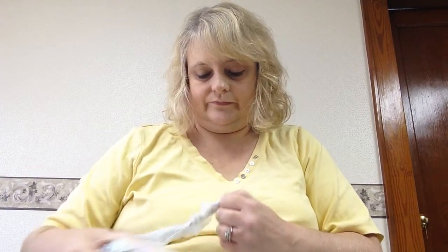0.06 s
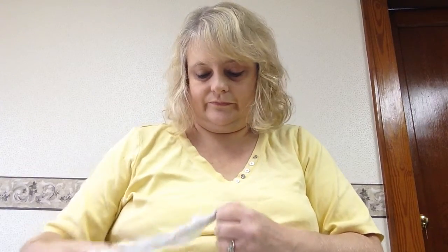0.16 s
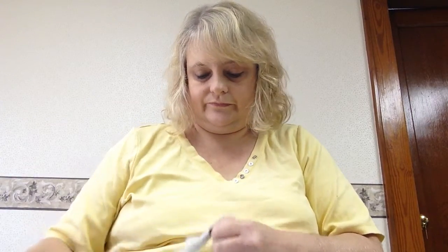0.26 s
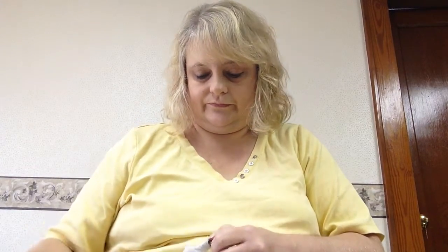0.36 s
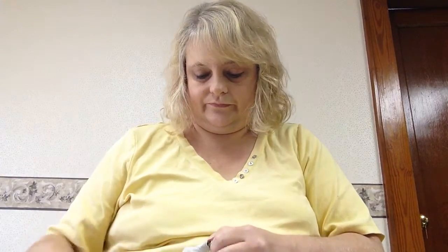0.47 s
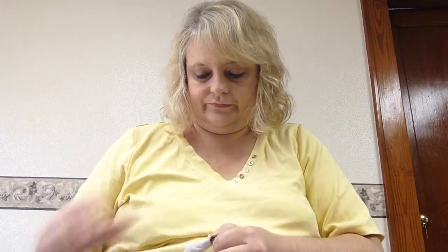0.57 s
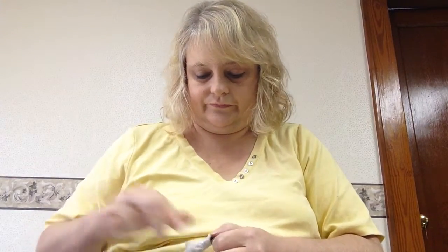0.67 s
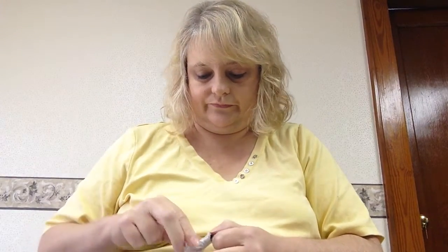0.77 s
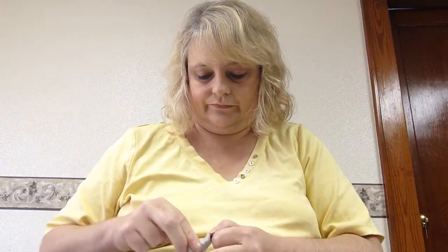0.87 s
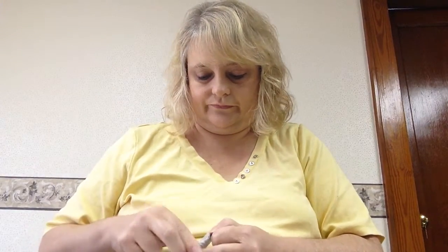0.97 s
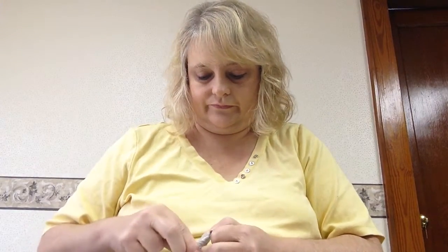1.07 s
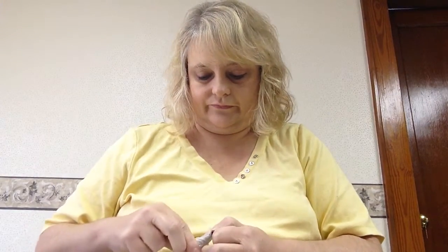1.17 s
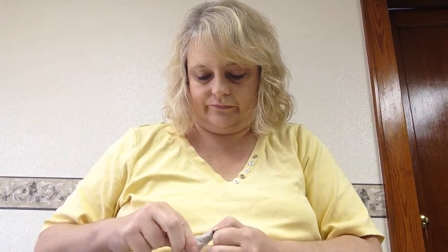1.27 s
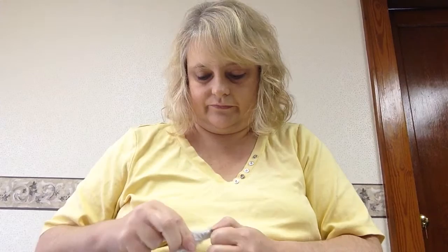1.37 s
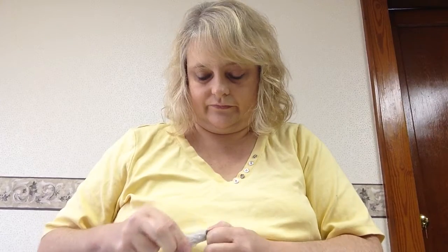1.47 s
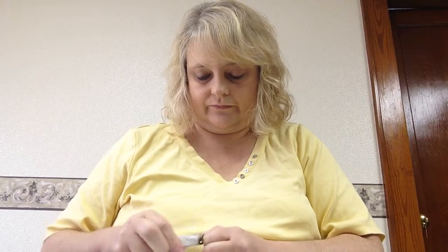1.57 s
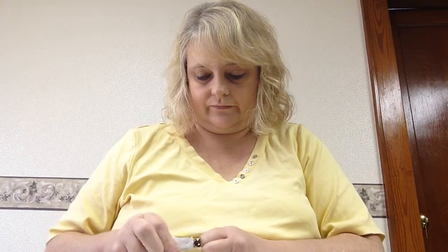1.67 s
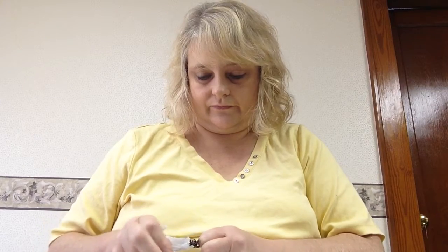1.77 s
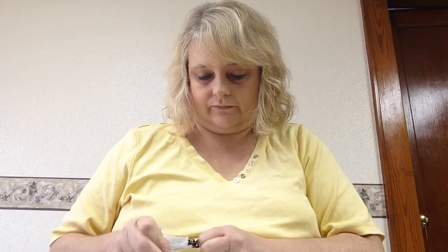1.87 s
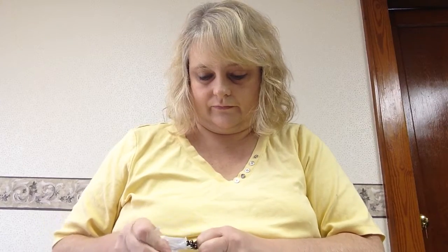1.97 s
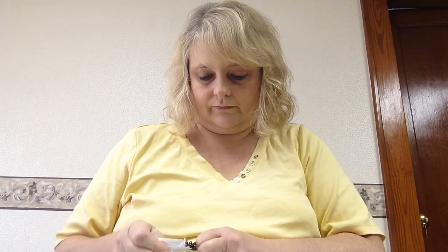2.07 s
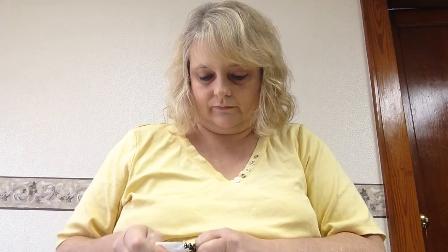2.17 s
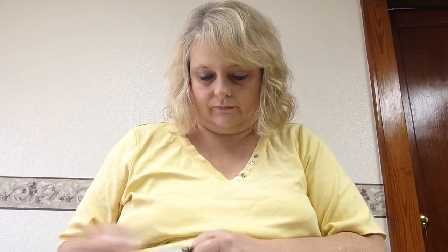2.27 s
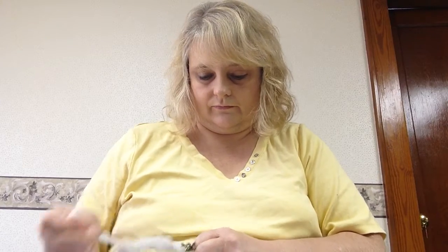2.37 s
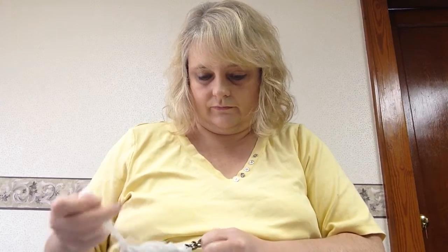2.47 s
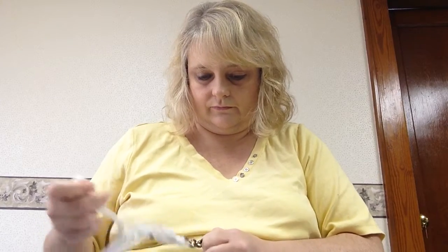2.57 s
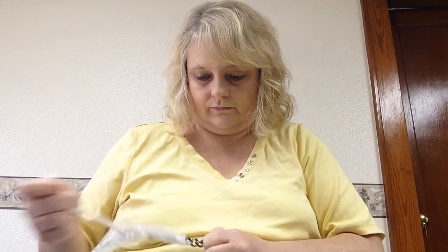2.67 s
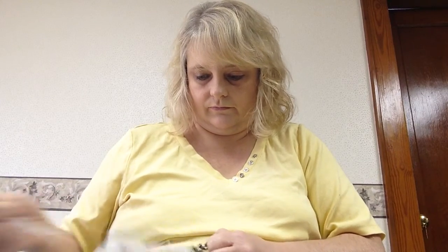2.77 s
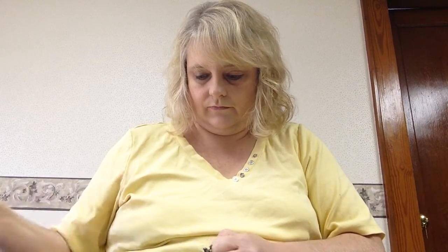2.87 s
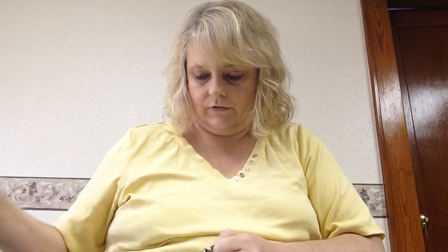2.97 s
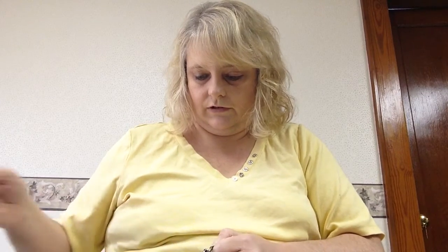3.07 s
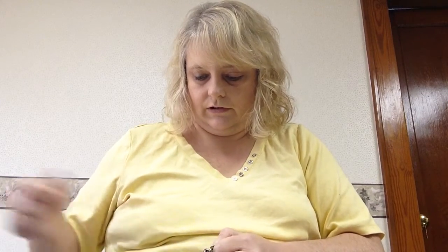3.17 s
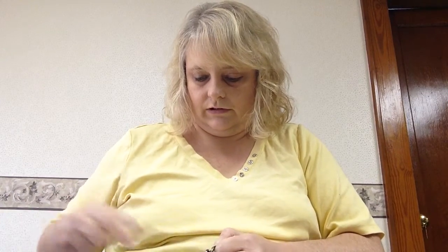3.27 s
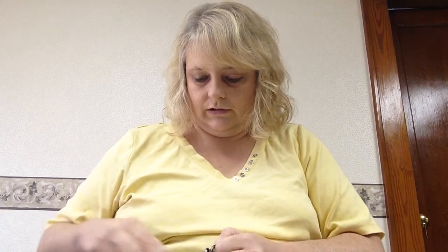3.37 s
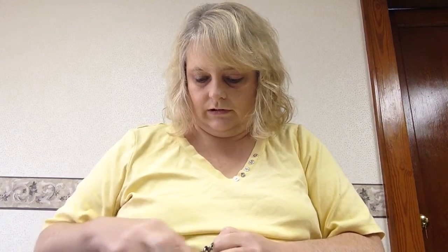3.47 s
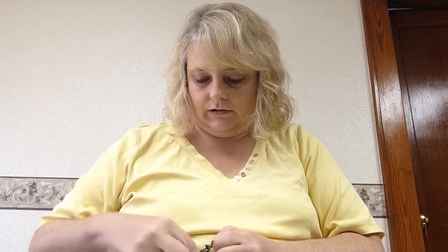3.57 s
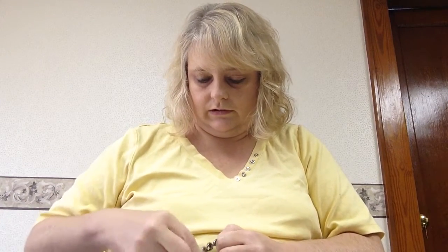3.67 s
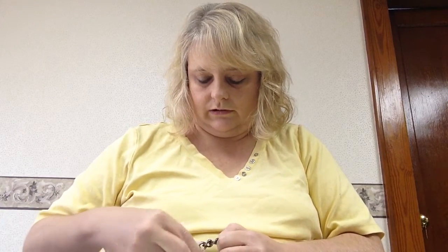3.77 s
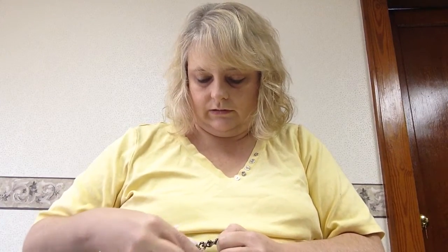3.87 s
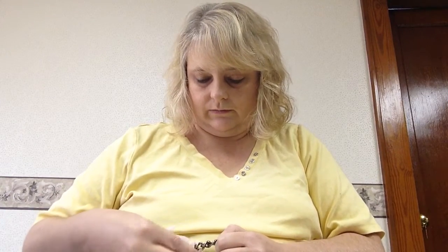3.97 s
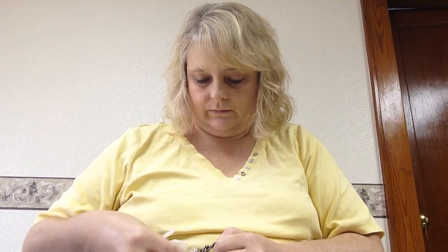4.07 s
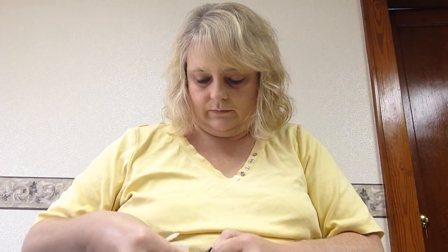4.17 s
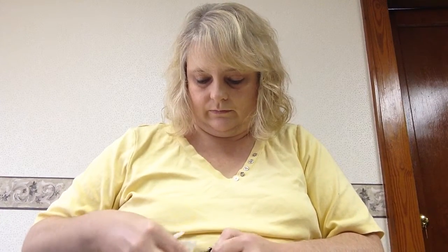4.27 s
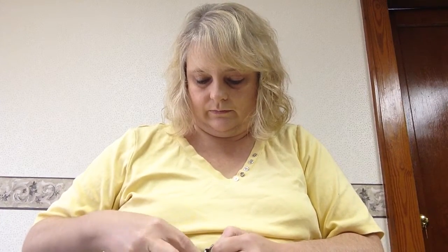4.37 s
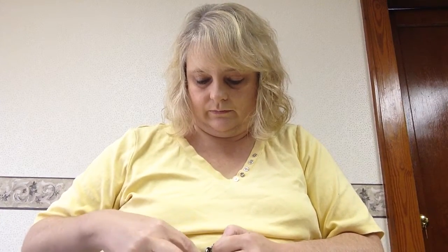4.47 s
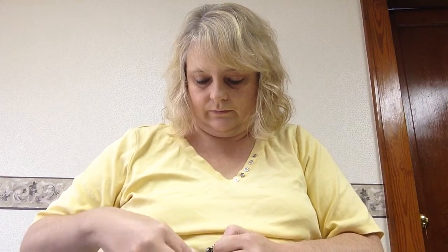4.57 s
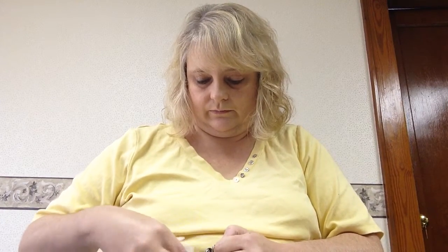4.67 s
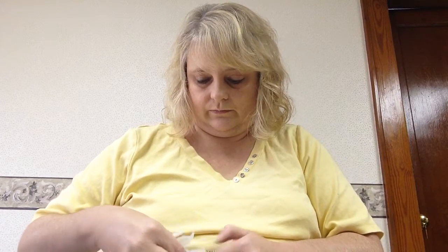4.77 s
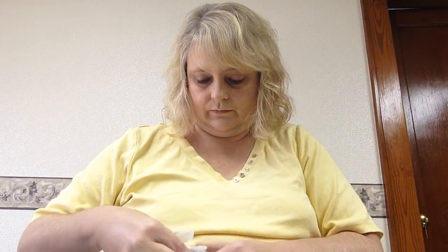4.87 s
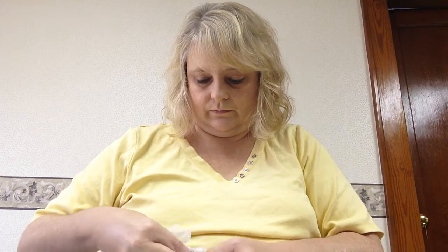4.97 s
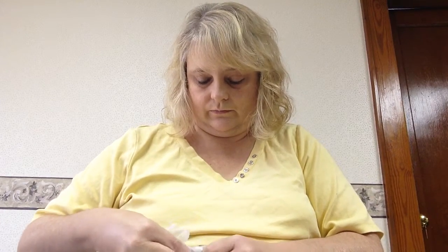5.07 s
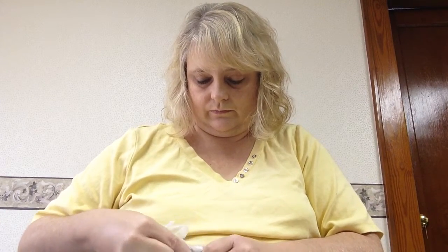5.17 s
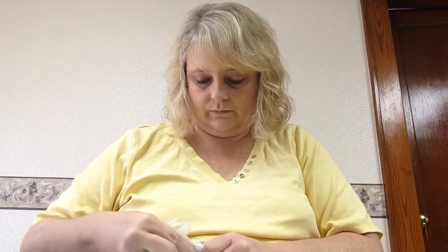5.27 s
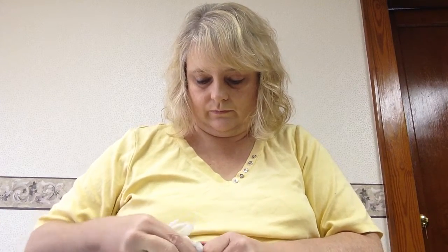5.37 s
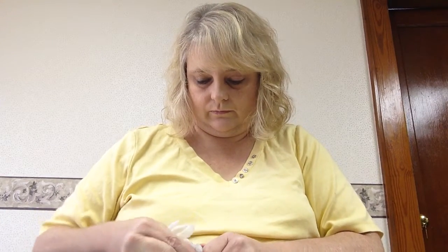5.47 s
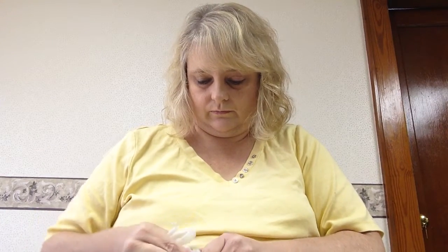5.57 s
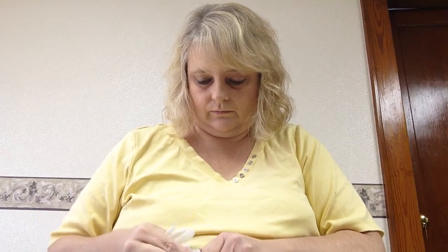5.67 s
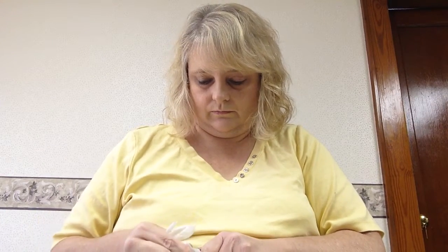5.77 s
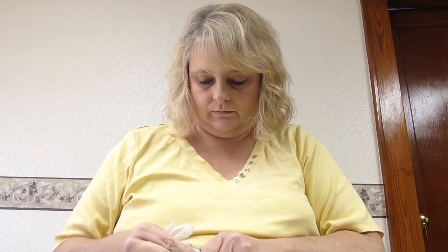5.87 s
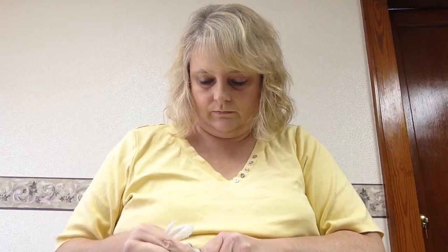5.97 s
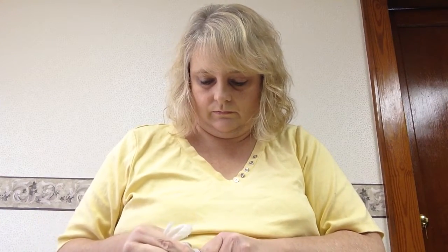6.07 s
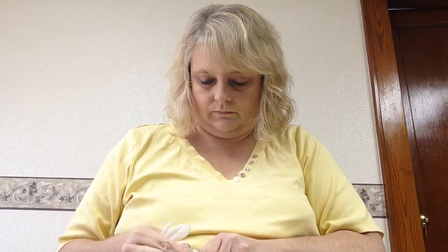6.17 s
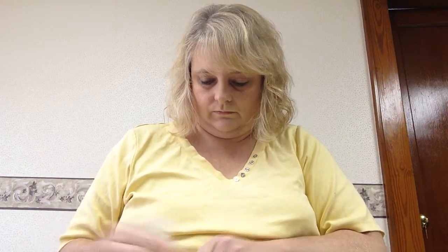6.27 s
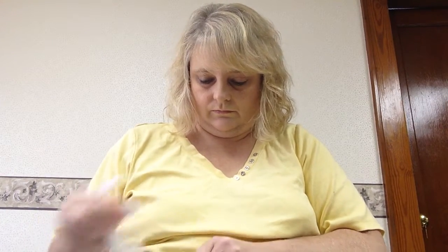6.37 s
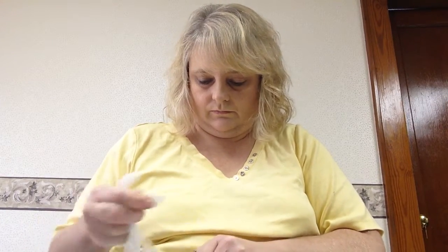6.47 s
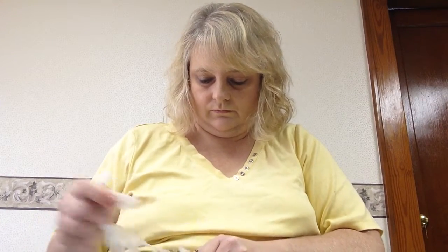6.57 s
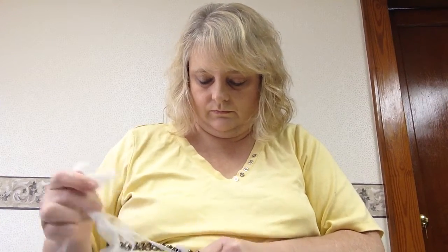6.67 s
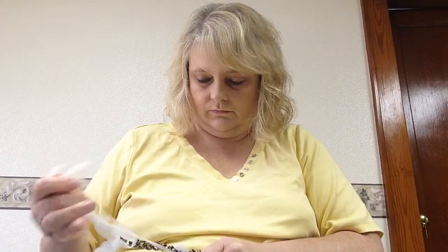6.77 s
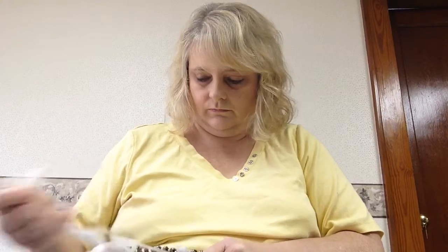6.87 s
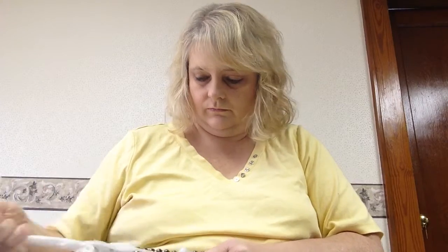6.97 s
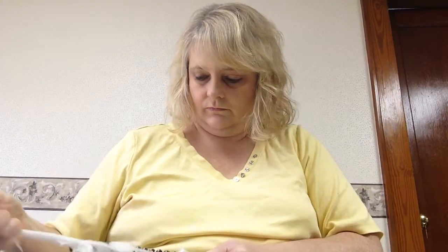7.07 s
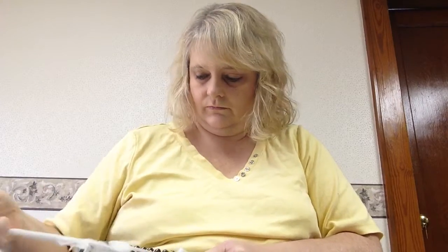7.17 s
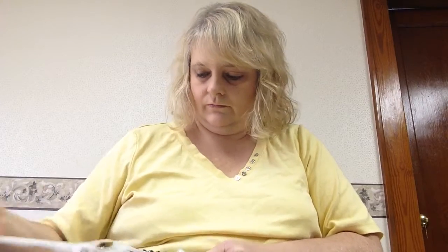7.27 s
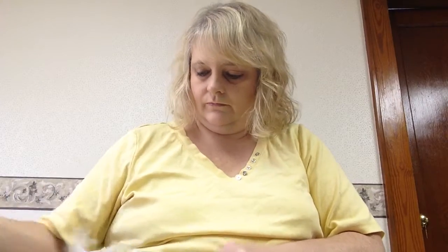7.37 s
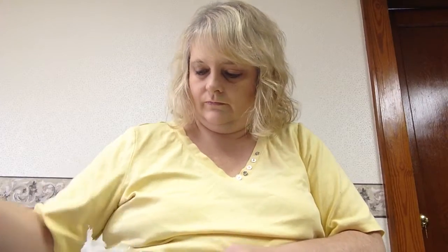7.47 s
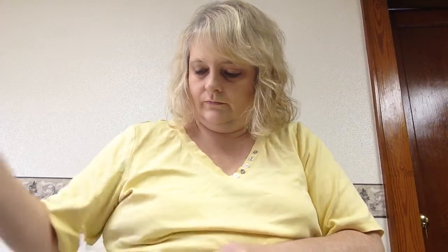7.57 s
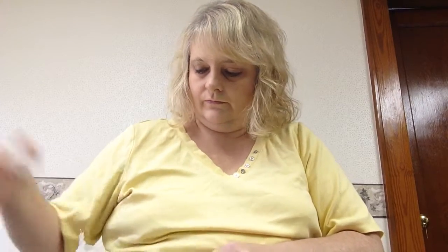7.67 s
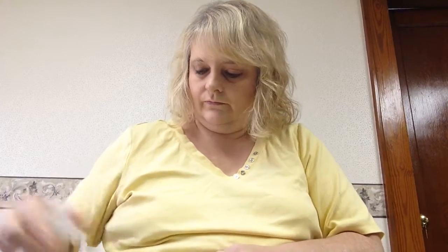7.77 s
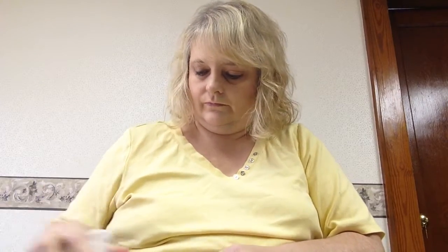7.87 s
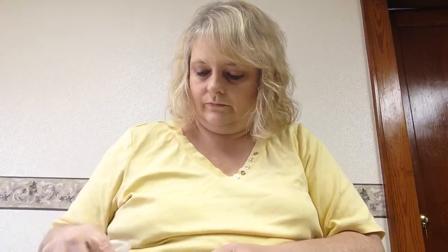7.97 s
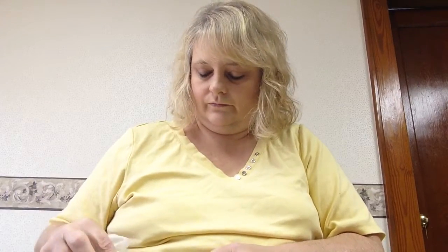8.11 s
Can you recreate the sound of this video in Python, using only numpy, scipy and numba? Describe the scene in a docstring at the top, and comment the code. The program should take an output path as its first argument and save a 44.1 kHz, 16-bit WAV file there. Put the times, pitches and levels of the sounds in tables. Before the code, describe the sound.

Close to a camera microphone in a small furnished room, hands peel thin plastic wrap from a chain strap. Light ticking crackle grows into sharp snapping bursts just after two seconds, sinks to a faint rustle for several seconds, then bursts loudest past six seconds. More crackling pulls follow until about seven and a half. A low, slightly beating motor and mains hum runs throughout.

```python
"""Dense tiny ticks over a low beating hum: hands peel thin plastic wrap off a chain strap in a small room.
Creases buckle as short damped modes; the film lets go in louder snaps, clusters of such modes.
Soft knocks come through the bag and chain links ring briefly, all close to a camera microphone.
Household motors and mains hum as sines; air is shaped noise."""
import sys
import numpy as np
from scipy import signal
from scipy.fft import rfft, irfft
from scipy.io import wavfile
from scipy.ndimage import uniform_filter1d, map_coordinates
from numba import njit

SR = 44100
rng = np.random.default_rng(int(sys.argv[2]) if len(sys.argv) > 2 else 0)


def to_wav(sig):
    """Store sig (one row per channel, or 1-D mono) as 16-bit WAV at the path in sys.argv[1].

    Samples outside -1..1 are clipped; the rate is SR.
    """
    pcm = np.clip(np.atleast_2d(sig), -1, 1) * 32767
    pcm = np.round(pcm).astype(np.int16)
    wavfile.write(sys.argv[1], SR, pcm.T)  # frames by channels


def how_loud(loudness_db):
    """Turn decibels into a plain amplitude multiplier (0 dB gives 1, 20 dB gives 10)."""
    steps = np.asarray(loudness_db, float) / 20
    return 10 ** steps


N = 358974

# finger moves on the film: (peak time [s], crinkle level [dB, relative], rise [s], fall [s],
# tightness [-1 loose .. 1 taut, may exceed])
FINGER_MOVES = [(.07, -52.5, 0.45, 0.57, 0.53), (.35, -58, 0.11, 0.14, 0.22), (.56, -62, 0.22, 0.15, 0.51),
                (.812, -56, 0.0084, 0.044, -0.64), (0.889, -48.5, 0.049, 0.073, -0.26),
                (.99, -55, .07, 0.08, .4), (1.025, -53.5, .05, 0.027, .4), (1.1, -54.5, 0.094, .1, -0.035),
                (1.177, -48, 0.019, 0.017, -0.28), (1.28, -65, 0.31, 0.15, -0.69),
                (1.432, -50, 0.027, 0.048, -.3), (1.553, -49, 0.025, 0.15, -0.87),
                (1.64, -42.5, 0.16, 0.085, -0.016), (1.803, -43, 0.03, 0.034, 0.22),
                (1.959, -61, 0.34, 0.12, 0), (2.067, -57.5, 0.22, 0.042, -0.48),
                (2.155, -52, .08, 0.11, -0.095), (2.27, -59, 0.092, .1, -0.77),
                (2.296, -32.5, .004, 0.13, -0.097), (2.363, -29.5, 0.078, 0.06, 0.82),
                (2.5, -62, .1, .3, 0.73), (2.653, -43.5, 0.035, 0.13, -1.8), (2.75, -35, 0.12, .1, -0.22),
                (2.8, -33.5, 0.036, 0.033, -0.28), (2.887, -48, 0.09, 0.09, -0.41),
                (3.06, -58.5, 0.23, 0.089, -1.15), (3.186, -58.5, 0.15, 0.18, 0.59),
                (3.31, -64, 0.087, 0.09, -0.67), (3.487, -58, 0.089, 0.59, 0.28),
                (3.94, -61.5, 0.23, 0.094, -0.1), (4.034, -63.5, 0.081, .3, 0.052),
                (4.145, -58.5, 0.091, 0.09, 0.75), (4.24, -60.5, 0.18, .1, -0.18),
                (4.384, -64.5, 0.14, 0.66, -0.34), (4.6, -62, .05, 0.14, -0.85),
                (4.708, -62.5, .15, 0.24, 0.65), (4.86, -62, 0.49, 0.088, -0.32),
                (4.995, -60.5, 0.18, 0.22, 0.046), (5.197, -64, 0.14, .1, -0.32),
                (5.324, -64.5, .08, 0.19, .3), (5.439, -66.5, .14, 0.11, 0.34),
                (5.646, -63, 0.31, .1, -0.26), (5.739, -61, 0.033, 0.12, 0.25),
                (5.9, -69, 0.063, .09, 0.76), (6.05, -70, 0.23, 0.17, -0.24), (6.163, -65, 0.052, 0.064, 1),
                (6.249, -62, .025, 0.035, 0.18), (6.298, -46.5, 0.0057, .1, 0.52),
                (6.324, -31.5, 0.018, 0.06, .1), (6.368, -27, 0.027, 0.086, 0.3),
                (6.39, -33, .05, 0.033, 0.83), (6.53, -57.5, .1, 0.27, -0.69),
                (6.632, -50, 0.012, 0.062, 0), (6.68, -60, 0.22, 0.4, -1.4),
                (6.863, -35, 0.017, 0.028, -.1), (6.916, -40.5, 0.068, 0.13, -0.32),
                (7.0, -36, 0.2, 0.054, 0.72), (7.153, -45, 0.059, .04, 0.56), (7.23, -55, .1, .2, 1),
                (7.291, -39.5, 0.038, 0.19, 0.83), (7.374, -33.5, 0.056, 0.097, 0.93),
                (7.527, -45.5, 0.23, .14, -0.77), (7.67, -58.5, 0.072, 0.17, 1),
                (7.75, -57.5, 0.18, 0.11, -1.1), (7.863, -57.5, 0.018, 0.33, 0.36),
                (7.95, -57.5, .1, 0.17, 0.054), (8.14, -57.5, 0.16, .1, 0.35)]
# slack sheet hanging free and booming along: (time [s], body level near 1 kHz [dB, relative])
SLACK_BODY = [(0, -10), (.7, -3), (.9, -9), (1.0, -3), (1.3, -3), (1.55, -17), (1.81, -15.5), (1.9, -5),
              (2.25, -13), (2.4, -7), (2.65, -11.5), (2.8, -7.5), (2.95, -9), (3.06, -16.5), (3.5, -6),
              (4.5, -1.5), (5.0, -7.5), (5.6, -7.5), (6.3, -8), (7.0, -16.5), (7.36, -20), (7.45, 1),
              (7.6, -1), (7.8, -12), (8.14, -6.5)]
# film letting go: (time [s], nominal peak [dB], ring [Hz], body level [dB, relative])
FILM_SNAPS = [(.1251, -37, 7700, -18), (.2544, -41, 9400, -18), (.2817, -42, 9300, -11),
              (.5421, -42, 8100, -11), (.8051, -32, 9300, -26), (1.1578, -35, 5400, -19),
              (1.1725, -31, 2600, 10), (1.2123, -39, 7000, -16), (1.2307, -45, 7100, -11),
              (1.3685, -45, 6700, -11), (1.387, -46, 4600, -6), (1.4327, -38, 5200, -17),
              (1.4406, -35, 6000, -18), (1.4914, -35, 6000, -20), (1.6157, -30, 7200, -22),
              (1.7431, -38, 7900, -19), (1.7516, -38, 7600, -18), (2.0673, -31, 7000, -30),
              (2.284, -32, 5400, -19), (2.2898, -22, 6500, -19), (2.2938, -23, 6200, -15),
              (2.2957, -12, 5700, -15), (2.2973, -19, 7700, -12), (2.3585, -12, 6700, -17),
              (2.3616, -10, 3600, -10), (2.3643, -12, 3400, -9), (2.371, -20, 7200, -9),
              (2.3796, -20, 6800, -13), (2.4477, -33, 6400, -18), (2.4957, -41, 7900, -12),
              (2.6982, -29, 4700, -12), (2.718, -26, 4900, -8), (2.7272, -24, 3900, -6),
              (2.7396, -19, 6400, -4), (2.7478, -26, 4100, -7), (2.7537, -26, 4600, -6),
              (2.7637, -25, 4800, -5), (2.7804, -26, 5600, 0), (2.7851, -26, 5700, -5),
              (2.7964, -10, 3000, -6), (2.8057, -11, 3300, -8), (2.8978, -35, 8000, -14),
              (3.2846, -39, 6300, -18), (3.3727, -39, 7400, -15), (3.4968, -42, 6900, -18),
              (4.0316, -37, 3500, 5), (4.1448, -40, 7400, 0), (4.205, -45, 4300, -12),
              (4.2873, -39, 6300, -14), (4.9376, -43, 9900, -18), (5.0115, -42, 6400, -2),
              (5.1507, -44, 6700, -11), (5.3003, -47, 5000, -9), (5.3346, -39, 6000, -16),
              (5.441, -43, 6800, -11), (5.4736, -43, 4600, -10), (5.6456, -36, 2500, -12),
              (5.7679, -33, 4000, -3), (5.783, -50, 8500, -16), (5.796, -50, 9000, -16),
              (5.8152, -49, 8800, -12), (5.8983, -43, 7900, -19), (5.9018, -43, 6800, -20),
              (5.9803, -47, 7400, -13), (5.9985, -50, 6800, -9), (6.1582, -45, 7400, -19),
              (6.1854, -42, 7500, -17), (6.2003, -47, 8300, -14), (6.2105, -47, 8500, -16),
              (6.2448, -48, 7200, -11), (6.2936, -37, 6500, -10), (6.311, -27, 7300, -6),
              (6.3143, -22, 5900, -4), (6.3209, -22, 7100, -13), (6.3243, -18, 7200, -15),
              (6.3264, -17, 7000, -18), (6.3282, -9, 6000, -9), (6.3303, -14, 6100, -6),
              (6.3624, -8, 7000, -20), (6.3635, -8, 8600, -18), (6.3659, -12, 6500, -18),
              (6.3678, -13, 6500, -22), (6.3727, -12, 5900, 2), (6.3806, -19, 6800, -10),
              (6.3852, -12, 6600, -12), (6.3876, -13, 7300, -16), (6.3888, -11, 7400, -16),
              (6.39, -13, 5800, -10), (6.3932, -14, 5500, -11), (6.3956, -14, 7100, -12),
              (6.4498, -26, 6200, -10), (6.5407, -41, 3900, 1), (6.6295, -36, 5400, -12),
              (6.6385, -36, 6600, -9), (6.6712, -22, 6000, -29), (6.6939, -34, 5100, -19),
              (6.7058, -37, 5400, -11), (6.7265, -31, 6200, -3), (6.7372, -33, 5500, -7),
              (6.8283, -30, 5300, -7), (6.862, -21, 5700, -15), (6.8651, -24, 6500, -20),
              (6.9146, -22, 5400, -24), (6.9273, -25, 5600, -22), (6.9541, -28, 6000, -10),
              (6.9743, -27, 6200, -12), (7.0683, -38, 6800, -10), (7.1116, -38, 5400, -12),
              (7.1339, -36, 5700, -14), (7.1411, -34, 7100, -19), (7.2285, -23, 5600, -21),
              (7.2581, -32, 7000, -19), (7.2764, -29, 7300, -23), (7.285, -20, 7200, -15),
              (7.2971, -18, 8800, -19), (7.3332, -21, 6300, -18), (7.3357, -22, 7400, -20),
              (7.341, -23, 8100, -23), (7.3704, -18, 6500, -17), (7.3787, -17, 7200, -20),
              (7.3897, -26, 7300, -19), (7.4009, -22, 6700, -8), (7.4115, -9, 3700, -9),
              (7.6654, -39, 4600, -12)]
# strap knocking dully on the bag: (time [s], first-touch peak [dB], pitch [Hz])
BAG_KNOCKS = [(0.133, -52.5, 330), (0.349, -47.5, 694), (1.173, -42, 900), (2.358, -57, 596),
              (2.635, -46.5, 283), (2.793, -34.5, 590), (2.894, -52, 407), (4.032, -49, 1110),
              (4.148, -54, 1090), (4.62, -65, 218), (4.868, -49, 418), (6.326, -36, 726), (6.368, -40, 550),
              (6.947, -46.5, 304), (6.992, -43.5, 484), (7.408, -47, 748), (7.407, -46.5, 228),
              (7.995, -49.5, 600)]
# chain links touching: (time [s], favoured-mode peak [dB], favoured mode [index])
CHAIN_TOUCHES = [(4.768, -62, 1), (4.907, -56, 1), (4.937, -58, 1), (4.966, -62, 0), (4.987, -54, 0),
                 (5.026, -62, 1)]
# modes of a chain link: (frequency [Hz])
LINK_MODES_HZ = [7940, 9750]
# decay of the room by band: (band centre [Hz], T60 [s])
ROOM_DECAY = [(500, 0.13), (1500, 0.16), (4000, 0.17), (10000, 0.24)]
# motors and mains in the house: (frequency [Hz], nominal level [dB rms])
HUM_TONES = [(55.84, -65.8), (58.94, -69.9), (74.31, -67.6), (111.43, -66.9), (116.74, -73.8),
             (117.87, -60.0), (120.02, -65.9), (131.56, -77.9), (148.57, -76.3), (223.31, -84.4),
             (235.76, -79.0), (240.03, -82.1)]
# air noise spectrum: (frequency [Hz], density [dB per Hz, relative])
AIR_SPECTRUM = [(20, -31), (45, -9), (70, -0.5), (90, -29), (112, 3.5), (200, -8), (293, -12), (489, -9),
                (560, -17.5), (750, -18.5), (1440, -32.5), (2220, -29), (7500, -44), (13200, -53),
                (16000, -62)]

RING_HZ, RING_OCTAVES = 6260, 0.57  # commonest crease pitch at zero tightness; lift at full tightness


def crinkle(spread_db=2.0, cycles=0.94, flutter_db=2.0, patchy_db=2.5, ring_db=3.5):
    """Creases buckle 18000 times a second, each a tick of its own pitch; a few are much bigger."""
    when_s, place, sign = rng.random((int(18000 * N / SR), 3)).T
    when_s = when_s * N / SR
    pitch = np.sqrt(place)  # small, high creases are the many
    hz = 220 * 2 ** (6.036 * pitch)
    size_db = np.minimum(spread_db * rng.exponential(size=len(when_s)), 15.0)

    # wide folds sound low, narrow ones high; grip and tightness set the share of each
    level_db, tight = hands(when_s)
    body_db = np.interp(when_s, *np.transpose(SLACK_BODY))
    # taut film gains treble; a pinched sheet loses it along with its body
    sheen_db = -7 + 7 * tight + 0.3 * (body_db + 12.5)
    low = np.clip(np.log2(2800 / hz) / 0.87, 0, 1)
    high = np.clip(np.log2(hz / 7500) / 0.79, 0, 1)
    colour_db = low * (body_db + 7.5) + high * (sheen_db + 2.5)

    # creases near the commonest pitch get a boost
    ring_hz = RING_HZ * 2 ** (RING_OCTAVES * tight)
    colour_db += ring_db * np.exp(-(np.log2(hz / ring_hz) / 0.61) ** 2)
    fold_db = -3.0 * np.maximum(np.log2(800 / hz), 0) + 3.59 * np.log2(hz / 5000)

    # ticks bunch, and each fold favours its own pitches for some 25 ms
    bunch_db = flutter_db * walk(120)[(when_s * SR).astype(int)]
    folds = rng.standard_normal((int(40 * N / SR) + 2, 16))
    bunch_db += patchy_db * map_coordinates(folds, [40 * when_s, 15 * pitch], order=1)

    db = level_db + colour_db + fold_db + size_db + bunch_db - 10.5
    return grains(when_s, hz, cycles, np.sign(sign - .5) * how_loud(db))


def hands(when_s):
    """Crinkle level [dB] and tightness: moves swell and fade, the loudest dominates the tightness."""
    swing_db, rest_db = 20, -95  # gain per rise time and loss per fall time; film settling between moves
    grid_s = np.arange(0, N / SR + .001, .001)
    peak_s, db, rise_s, fall_s, tight = np.array(FINGER_MOVES).T[:, :, None]
    before = (peak_s - grid_s) / np.maximum(rise_s, .003)
    after = (grid_s - peak_s) / np.maximum(fall_s, .003)
    away = np.where(grid_s < peak_s, before, after)
    power = how_loud(2 * (db - swing_db * away))
    total = power.sum(axis=0) + how_loud(2 * rest_db)
    level_db = np.interp(when_s, grid_s, 10 * np.log10(total))
    return level_db, np.interp(when_s, grid_s, (power * tight).sum(axis=0) / total)


def snaps(rows, octaves=0.55, scatter_s=.0003, cycles=1.0):
    """A snap is nine ticks within about a millisecond around its ring, plus a three-tick lower pop."""
    when_s, peak_db, hz, body_db = rows.T[:, :, None]
    late, pitch, sign = np.moveaxis(rng.standard_normal((len(rows), 12, 3)), 2, 0)
    tick = np.arange(12)
    pop = tick >= 9
    # ticks fan out evenly above and below their centre
    fan = octaves * np.where(pop, 1.5 * (tick - 10), (tick - 4) / 2.6) + .12 * pitch
    tick_hz = np.where(pop, 1450, hz) * 2 ** fan
    # ticks and pop share the peak; a lower ring lasts longer, so each tick adds less
    tick_db = peak_db - 10 * np.log10(1 + how_loud(2 * body_db)) + 2.0 * np.log2(hz / 6500)
    # lower ticks last longer, so they start smaller
    db = tick_db + np.where(pop, body_db - 9.0, -9.0) + 5.3 * fan - 8.9 * fan ** 2
    tick_s = when_s + scatter_s * late - .0003
    return grains(tick_s.ravel(), tick_hz.ravel(), cycles, (np.sign(sign) * how_loud(db)).ravel())


def strays(rate_per_s=60, over_crinkle_db=8, spread_db=2.5):
    """Rows of small snaps at random moments, louder when the hands work harder."""
    when, size, pitch, body = rng.random((int(rate_per_s * N / SR), 4)).T
    when_s = when * N / SR
    level_db, tight = hands(when_s)
    hz = RING_HZ * 2 ** (RING_OCTAVES * tight + 0.9 * (pitch - .5))
    peak_db = level_db + over_crinkle_db - spread_db * np.log(size)
    return np.c_[when_s, peak_db, hz, -20 + 16 * body]


def knocks(cycles=1.1):
    """Soft low bumps of a heavily damped mode, each with a higher second touch 11 ms after."""
    when_s, peak_db, hz = np.array(BAG_KNOCKS).T
    first = grains(when_s, hz, cycles, how_loud(peak_db))
    return first + grains(when_s + 0.011, 1.44 * hz, cycles, how_loud(peak_db - 2.5))


def links(cycles=21.0):
    """Small metal links touch and ring for a moment, all with the same modes."""
    when_s, peak_db, favoured = np.array(CHAIN_TOUCHES).T
    out = 0
    for k, hz in enumerate(LINK_MODES_HZ):
        mode_db = peak_db - 10.0 * (favoured != k)
        out = out + grains(when_s, hz + 0 * when_s, cycles, how_loud(mode_db))
    return out


@njit
def ring(start, hz, cycles, size, count):
    """Each grain is a mode that swells quickly to its size and dies away over its cycles."""
    out = np.zeros(count + 2048)
    for k in range(len(start)):
        fade = hz[k] / SR / cycles[k]
        p = np.exp(2j * np.pi * hz[k] / SR - fade)
        z = size[k] * np.e * fade + 0j
        for i in range(min(int(8 / fade), 2048)):
            out[start[k] + i] += i * z.imag
            z *= p
    return out[:count]


def grains(when_s, hz, cycles, size):
    """Damped modes at the given times, kept inside the scene and under the top of hearing."""
    start = np.clip(when_s * SR, 0, N - 1).astype(np.int64)
    return ring(start, np.clip(hz, 100, .4 * SR), cycles * np.ones(len(when_s)), size, count=N)


def walk(rate_hz):
    """Random levels drawn at rate_hz and slewed from one to the next."""
    k = int(SR / rate_hz)
    return uniform_filter1d(np.repeat(rng.standard_normal(N // k + 1), k), k)[:N]


def room(level_db=-12):
    """Echoes of a small furnished room: noise bands, each decaying at its own T60."""
    t = np.arange(SR // 2) / SR
    tail = 0
    for hz, t60_s in ROOM_DECAY:
        edges_hz = [hz / 1.7, min(hz * 1.7, .45 * SR)]
        band = signal.butter(2, edges_hz, "band", fs=SR, output="sos")
        tail = tail + signal.sosfilt(band, rng.standard_normal(len(t))) * how_loud(-60 * t / t60_s)
    tail = tail * np.clip(t / 0.00055, 0, 1)
    return how_loud(level_db) * tail / np.sqrt(np.sum(tail ** 2))


def hum(waver_db=.8):
    """Steady tones from motors and mains, close enough to beat; each wavers slowly in level."""
    t = np.arange(N) / SR
    out = 0
    for hz, db in HUM_TONES:
        level = np.sqrt(2) * how_loud(db + waver_db * walk(1.6))
        out = out + level * np.sin(2 * np.pi * hz * t)
    return out


def air(level_db=-60.5):
    """Ventilation rumble and microphone hiss: white noise shaped in frequency, set to an rms level."""
    hz, db = np.array(AIR_SPECTRUM).T
    f = np.arange(N // 2 + 1) * SR / N + 1
    shape = how_loud(np.interp(np.log(f), np.log(hz), db))
    noise = irfft(rfft(rng.standard_normal(N)) * shape, N)
    return how_loud(level_db) * noise / noise.std()


def scene():
    """Film, bag and chain ring the room; hum and air are added without its echoes."""
    near = crinkle() + snaps(np.array(FILM_SNAPS)) + snaps(strays()) + knocks() + links()
    echoes = signal.fftconvolve(near, room())[:N]
    return (near + echoes + hum() + air())[None]


def band_limit(x):
    """A steep low-pass at the top of the band."""
    return signal.sosfilt(signal.butter(12, 16470, fs=SR, output="sos"), x)


def record(dry):
    """The camera cuts the top with a steep low-pass at 15150 Hz."""
    top = signal.ellip(8, .3, 60, 15150, fs=SR, output="sos")
    return band_limit(signal.sosfilt(top, dry))


dry = scene()
out = record(dry)
to_wav(out)
```